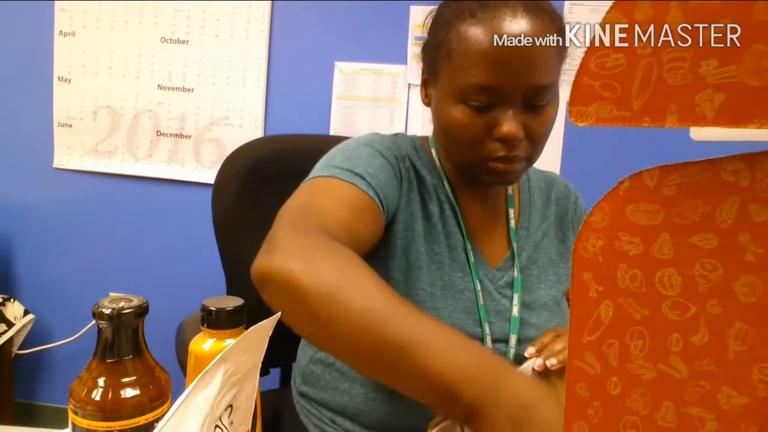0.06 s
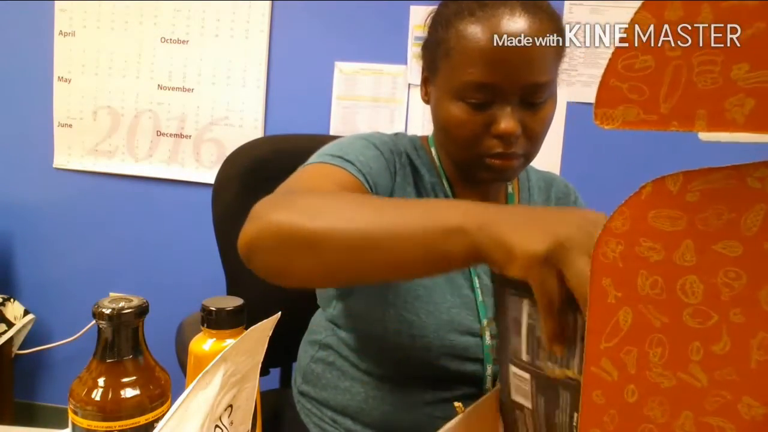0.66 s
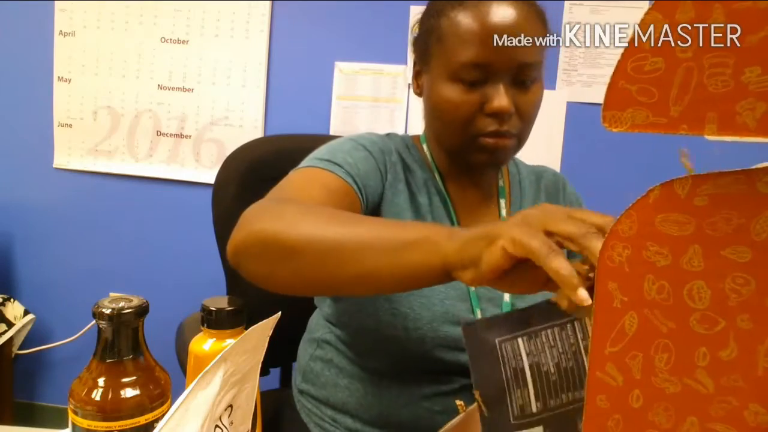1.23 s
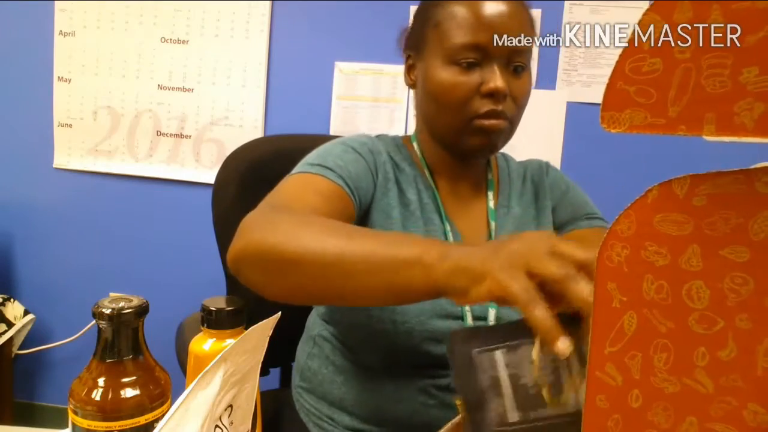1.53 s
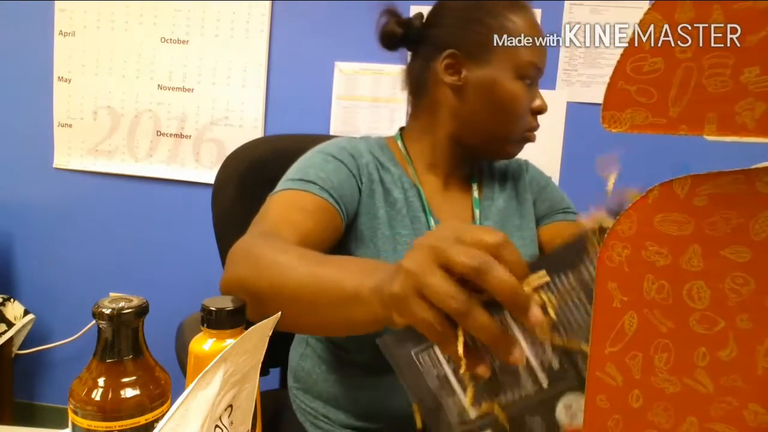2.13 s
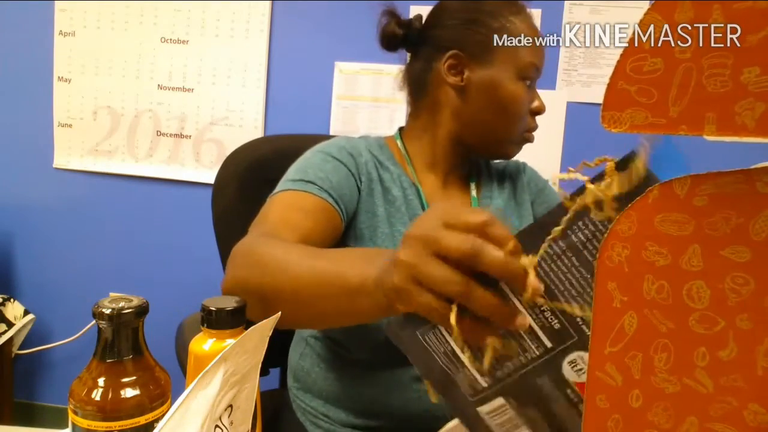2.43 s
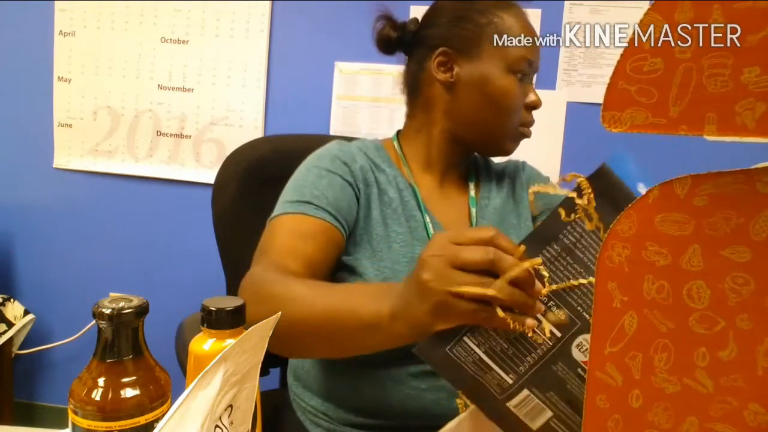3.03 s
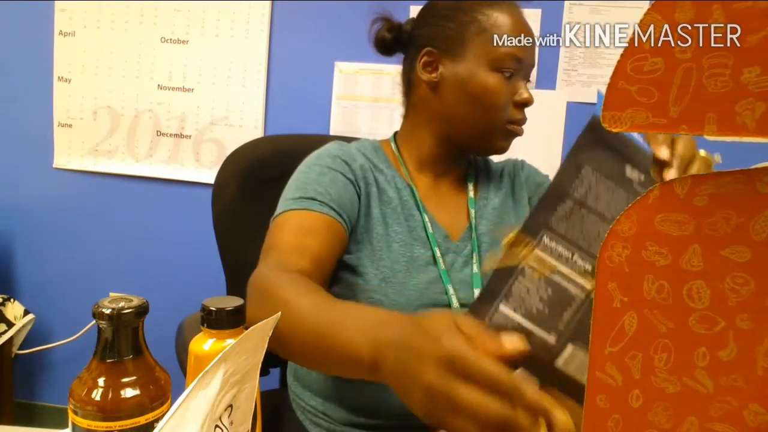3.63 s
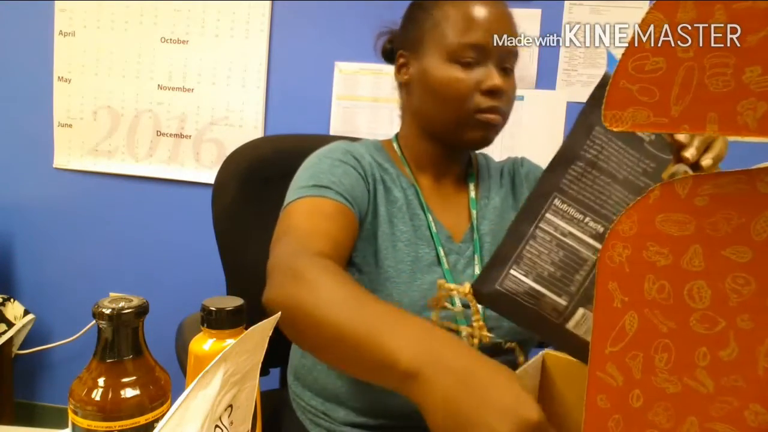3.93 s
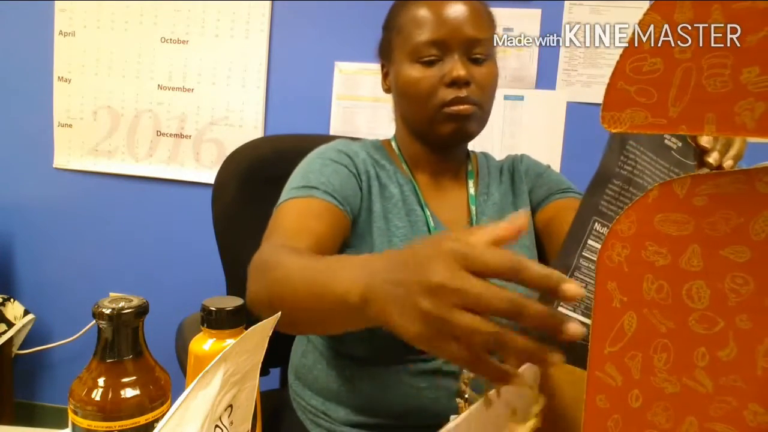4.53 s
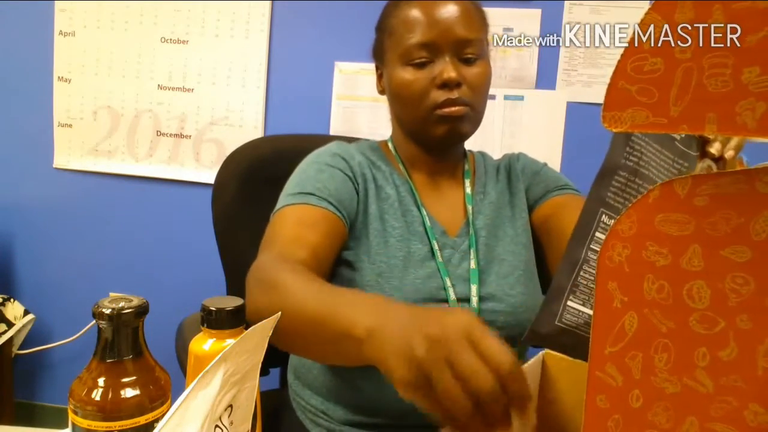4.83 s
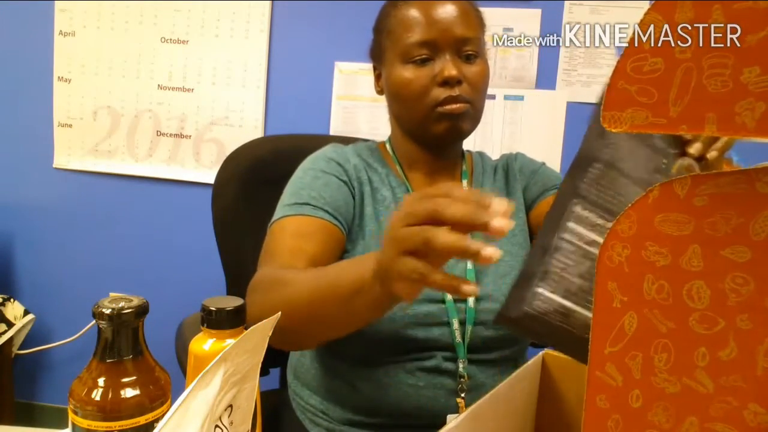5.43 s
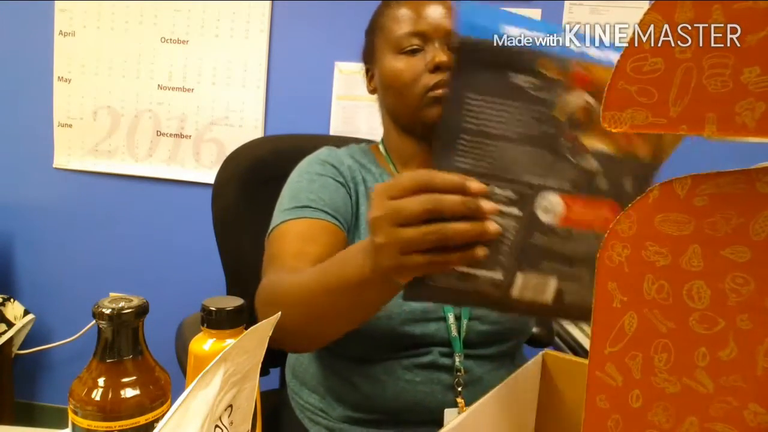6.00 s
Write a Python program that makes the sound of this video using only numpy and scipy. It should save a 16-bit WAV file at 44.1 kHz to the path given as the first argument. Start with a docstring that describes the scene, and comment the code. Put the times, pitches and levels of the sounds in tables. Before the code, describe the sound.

A plastic pouch is pulled from rustling paper filler in a cardboard box, then crackles more softly as it is handled.

```python
"""A plastic pouch is pulled out of crinkle-paper filler in a cardboard box on an office desk.
Strips and film hiss and crackle in countless tiny slips; each stroke swells, holds and settles over
the faint rustle of the grip. Creases snap, panels pop, the box hoots and is bumped and scraped, and
later the pouch rings softly as it is grabbed. The handling reaches the left of two closely spaced
microphone ports first and leans slightly right in level, in a small room with a low ventilation hum."""
import sys
import numpy as np
from scipy import signal
from scipy.fft import rfft, irfft
from scipy.io import wavfile
from scipy.ndimage import uniform_filter1d

SR = 44100
rng = np.random.default_rng(int(sys.argv[2]) if len(sys.argv) > 2 else 0)


def output_pcm(signal):
    """Save a mono or channel-first signal as 16-bit PCM at the path in sys.argv[1].

    Samples are clipped to [-1, 1] before scaling.
    """
    pcm = np.clip(np.atleast_2d(signal).T, -1, 1) * 32767
    wavfile.write(sys.argv[1], SR, np.round(pcm).astype(np.int16))


N = 276066

# Levels in the tables are relative: each source sets its own gain on the way to the microphone.
# strokes of the hand: start_s, rise_s, hold_s, crinkle_db, then against it wad_db, drag_db, fizz_db
STROKES = [(0, 0.0014, .008, -31, -4, -6, -14), (.035, 0.023, 0.018, -32.5, -0.5, -0.5, -5),
           (0.077, 0.032, 0.048, -33.5, 1.5, 0.5, -24), (0.166, .02, 0.023, -47.5, 7, 9, -19),
           (0.305, 0.013, 0.095, -30.5, 0, 4, -16), (0.321, 0.087, 0.053, -22, -8.5, -10.5, -13.5),
           (0.468, 0.019, 0.067, -36, 0, 0, -12), (0.577, 0.037, 0.11, -40.5, -3.5, 0, -12.5),
           (.643, 0.0045, 0.029, -36.5, -0.5, 4.5, -10), (0.708, 0.052, .03, -34, 1, 1, -19),
           (0.759, 0.039, 0.023, -25, -5.5, -10, -14), (0.815, 0.014, 0.036, -28.5, -7, -14, -11.5),
           (0.935, 0.023, 0.032, -47.5, -0.5, -2, -19), (1.046, .045, .04, -46, -2.5, -2.5, -22),
           (1.138, 0.043, 0.1, -50, -11, -5, -16), (1.238, 0.0053, 0.018, -48.5, 0.5, 7, -20),
           (1.318, .02, 0.033, -53, -26, -14, -14), (1.468, 0.058, 0.069, -47.5, -5, -4, -15),
           (1.589, 0.044, 0.12, -42, -13.5, -14, -12), (1.758, 0.024, 0.047, -42, -4, 1, -15),
           (1.828, 0.019, 0.073, -41.5, -12.5, -16.5, -10.5), (2.011, 0.035, 0.1, -49, -10, -19, -12),
           (2.169, 0.034, .005, -42.5, -11, -13.5, -10), (2.286, .025, 0.024, -49.5, -12, -8, -11),
           (3.026, .11, 0.016, -60, -6, 4, -19), (3.195, 0.17, .05, -54.5, -7, -2, -18),
           (3.517, 0.065, 0.13, -48.5, -8.5, -6.5, -19), (3.827, 0.052, 0.057, -48, -5.5, -15, -19),
           (4.231, 0.022, 0.095, -58, -5.5, -3, -12.5), (4.608, .015, 0.047, -66, -11, -15, -15),
           (4.748, 0.045, 0.019, -63, -12, -9.5, -11), (4.948, 0.076, .12, -66.5, -2.5, 0.5, -9),
           (5.74, 0.027, 0.032, -48.5, -1, -0.5, -27), (5.844, .015, .015, -62.5, -2, 5.5, -20),
           (5.902, 0.016, 0.02, -51, -3, -3.5, -17)]
# faint rustle of the pouch held between strokes: time_s, crinkle_db
GRIP_LEVEL = [(.25, -45.5), (.9, -47), (1.05, -57), (1.43, -62), (1.95, -49), (2.45, -60.5), (2.75, -67.5),
              (3.0, -67), (3.5, -57), (4.05, -69), (4.55, -73.5), (5.2, -71.5), (5.6, -78), (6.26, -74.5)]
# crinkle of the paper strips: frequency_hz, level_db
PAPER_SPECTRUM = [(1200, -57.5), (2600, -7.5), (4000, -6.5), (5200, -5), (6500, 0), (8200, -6),
                  (10000, -11.5), (12500, -23), (15500, -29)]
# crinkle of the free pouch's film: frequency_hz, level_db
FILM_SPECTRUM = [(1200, -48), (2600, -5.5), (4000, -8), (5200, -5.5), (6500, -1), (8200, -2.5),
                 (10000, -12.5), (12500, -19.5), (15500, -25)]
# duller crumple of the paper wad: frequency_hz, level_db
WAD_SPECTRUM = [(350, -17), (600, -2), (780, -1.5), (980, -3), (1300, -1.5), (1900, -5.5), (2800, -6.5),
                (4200, -6.5), (8000, -34)]
# fizz of the finest slips: frequency_hz, level_db
FIZZ_SPECTRUM = [(4000, -40), (8000, 6.5), (10000, 15), (12000, 10), (15000, 2.5)]
# the pouch's own walls flexing: frequency_hz, level_db
FLEX_SPECTRUM = [(80, -20.5), (170, -2), (235, 0.5), (350, 1), (480, -0.5), (620, -7.5), (790, -3),
                 (1050, -16.5), (3000, -46)]
# sharp creases snapping: start_s, level_db, ring_hz, give_way_s
SNAPS = [(.0325, -13.5, 6450, .0016), (.0497, -14, 6940, 0.00072), (.1115, -33, 7000, .0005),
         (.1217, -27, 5400, .001), (.1295, -29, 4500, 0.00044), (.1529, -24.5, 6100, .0012),
         (.246, -32.5, 6160, .001), (.6535, -17.5, 6240, 0.0013), (1.1258, -39, 6540, .0007),
         (1.1507, -32.5, 6950, 0.00078), (1.1872, -37.5, 7400, .0009), (1.2064, -34, 7300, 0.00072),
         (1.3153, -29, 7640, 0.0014), (1.3585, -42, 7700, .001), (1.6127, -43, 7160, .001),
         (1.7408, -33, 6340, 0.0022), (1.7796, -28, 7000, .0015), (1.7868, -31, 6450, 0.00098),
         (1.8472, -32.5, 7510, .002), (1.9075, -35, 6300, 0.001), (2.0127, -38, 7400, .001),
         (2.193, -47, 8260, .002), (2.2252, -34.5, 6560, 0.00041), (3.2427, -46, 6600, 0.0012),
         (3.5945, -41, 7000, .0012), (3.6275, -36, 5800, 0.0024), (3.678, -40.5, 5450, .002),
         (4.2614, -38.5, 8200, .0009), (5.0246, -49, 6450, 0.0013), (5.0662, -50, 6760, .0014),
         (5.0785, -41.5, 5340, .0005), (5.0822, -33, 6750, 0.001), (5.2123, -52, 6100, .0007),
         (5.7535, -44.5, 4100, .0012), (5.9252, -37.5, 5570, .0005)]
# snap of a middle-sized crease: frequency_hz, level_db
SNAP_SPECTRUM = [(500, -21), (2000, -2.5), (3500, 2), (6500, 0), (9000, 0.5), (12000, -8), (15500, -14)]
# pouch panels popping: start_s, level_db, ring_hz, push_db (air, relative), muffled_above_hz
POPS = [(.0335, -19.5, 2020, -19, 9000), (.0922, -27, 750, -1.5, 3000), (.2469, -29.5, 1160, -1.5, 7000),
        (.879, -35, 600, -4, 2500), (.9072, -26, 3020, -5, 9000), (.97, -35, 1830, 0, 7500),
        (1.064, -41.5, 1300, 3, 8000), (1.0905, -37, 875, 0, 4500), (1.1028, -35.5, 1400, -6, 6000),
        (1.2535, -33.5, 1090, -2.5, 9000), (1.4632, -50.5, 1190, 6.5, 2500), (1.5208, -38, 2400, -1, 3200),
        (1.5278, -32, 1830, -4.5, 5000), (1.7794, -33.5, 1300, -8, 7000), (1.7865, -34, 800, -5, 4000),
        (2.0233, -42, 890, 0, 2800), (2.0501, -32, 1290, -5, 6000), (2.2255, -43, 1500, -7, 7000),
        (2.4933, -51, 850, 6.5, 1150), (2.6115, -52, 1480, -12, 3000), (2.7005, -49.5, 880, -2, 1240),
        (2.7826, -48.5, 1150, 1.5, 2000), (2.9036, -50.5, 1150, 2.5, 3000), (3.0479, -50.5, 1090, -8, 4000),
        (3.0864, -46.5, 2200, -18, 4000), (3.135, -53.5, 900, 1, 2000), (3.2198, -55, 900, 8, 2500),
        (3.2617, -41, 1780, -10, 7000), (3.3553, -41, 1190, -3.5, 3200), (3.3635, -49, 1010, 1, 2000),
        (3.574, -41.5, 960, 5, 9000), (3.6869, -39.5, 1800, -7, 5960), (4.2866, -52, 1002, 0.5, 3000),
        (5.4493, -49, 1895, -9, 3800), (5.6602, -46.5, 1005, -12, 1410), (5.7527, -43, 1980, -5.5, 4960),
        (5.7787, -34, 2400, -5, 6000), (5.7885, -41, 800, -5, 3500), (5.8105, -41, 900, 0, 1380),
        (5.859, -54, 790, -1, 1100), (5.8847, -44.5, 1200, -6, 1700), (5.9248, -37, 2490, -5, 7000),
        (6.1454, -55.5, 1020, -2, 2010)]
# pop of a middle-sized panel: frequency_hz, level_db
POP_SPECTRUM = [(200, -9.5), (500, -2), (1000, -1.5), (1900, -3.5), (2900, -3), (4500, -22), (10000, -36.5)]
# low push of air from a panel: frequency_hz, level_db
PUSH_SPECTRUM = [(50, -24.5), (150, -8), (230, -0.5), (310, 0.5), (430, -2), (620, -11), (850, -9.5),
                 (2500, -53.5)]
# the pouch dragging along the box wall: frequency_hz, level_db
DRAG_SPECTRUM = [(70, -34), (180, -20.5), (300, -2), (450, 1.5), (700, -5.5), (1100, -15.5), (3000, -38)]
# the hollow's pitch, which sinks to a lower note around 0.65 s: time_s, pitch_hz
HOLLOW_PITCH = [(.02, 436), (.12, 492), (.245, 355), (.3, 453), (.42, 452), (.46, 494), (.5, 437),
                (.58, 444), (0.649, 297), (.69, 288), (.745, 425), (.84, 457), (.92, 367)]
# resonances of the hollow: pitch_ratio, width_hz, level_db
HOLLOW_MODES = [(1.001, 65, 0), (1.8, 110, -14), (2.85, 70, -11), (3.65, 85, -14.5)]
# modes of the cardboard wall: pitch_hz, level_db, t60_s
WALL_MODES = [(108.5, -6, 0.33), (133.4, -11, 0.21), (256, -1, .22), (304, -17, .11), (476.5, -1, 0.18),
              (660, -2, 0.07), (767, 3.5, 0.1), (904, -5.5, .11), (1196, -1.5, 0.093), (1540, -4, 0.078)]
# the wall rubbed: start_s, rise_s, hold_s, level_db
WALL_SCRAPE = (3.85, 0.08, 0.05, -46)
# hollow knocks, the box wall bumped and later a soft ring as the pouch is grabbed:
# start_s, level_db, middle_hz of the modes that ring
KNOCKS = [(1.782, -33.5, 151), (1.781, -36, 800), (1.795, -32.5, 400), (5.809, -53, 250), (5.81, -50, 797)]
# the box shifting on the desk: time_s, level_db
SHIFT_LEVEL = [(0, -52), (.9, -55.5), (1.3, -57), (2, -52.5), (2.8, -68), (3.9, -59), (4.2, -80),
               (5.6, -77.5), (5.9, -60.5), (6.26, -67.5)]
# rumble of the shifting box: frequency_hz, level_db
RUMBLE_SPECTRUM = [(30, -22.5), (62, -9.5), (85, 2.5), (130, -4.5), (400, -33.5)]
# air noise of the ventilation: frequency_hz, level_db
AIR_SPECTRUM = [(12, -39), (20, -4), (44, -5.5), (63, -9.5), (106, 0.5), (225, -12.5), (315, -15),
                (958, -29), (2150, -30), (7730, -32), (15500, -34)]
# ventilation hum: pitch_hz, level_db
HUM_TONES = [(87, -64), (119, -68)]
# decay of the office: frequency_hz, t60_s
ROOM_DECAY = [(150, 0.69), (500, 0.11), (1400, 0.15), (4000, 0.22), (9000, 0.13), (15000, 0.12)]
# the handling's slight lean to the right in level: time_s, left_minus_right_db
HANDLING_BALANCE = [(.9, -1.5), (1.2, -1.8), (6.26, -2)]
# diffuse sound at the two ports: frequency_hz, likeness (0-1)
PORT_LIKENESS = [(100, 0.96), (300, .9), (600, 0.4), (1200, 0), (2500, 0.05), (15000, 0.08)]
# each port has its own treble resonance: frequency_hz, left_minus_right_db
PORT_BALANCE = [(300, 2.5), (750, 4), (1800, 3), (4000, 1.5), (5000, 3), (5800, 3.5), (6500, 11.5),
                (7300, -6.5), (8400, -7), (10000, -2), (12000, 0), (15000, 0.5)]

CLEAR_S = 0.97  # the pouch comes clear of the box
SETTLE_DB_PER_S, RISE_POWER = 270, 0.98  # shape of every stroke
LINGER_DB, LINGER_DB_PER_S = -14, 109  # a few strips go on springing back after a stroke
GRIP_WAD_DB, GRIP_DRAG_DB, GRIP_FIZZ_DB = -7.5, -5, -11.5  # offsets from the grip's crinkle_db
SNAP_SIZE_POWER, MIDDLE_SNAP_HZ = 0.54, 6250  # a smaller, higher crease is brighter all over
POP_SIZE_POWER, MIDDLE_POP_HZ = 0.57, 1000  # a pop's whole spectrum follows the ring of its panel
TICK_DB, TICK_HZ, TICK_S = -3.5, 4240, .0007  # a pop also snaps the crease at its edge
AIR_DB, BAND_LIMIT_HZ = -60.5, 15500


def pouch_in_filler(spot_count=4):
    """Paper and film slip under the hand: crinkle and fizz, the wad's crumple, the pouch's low drag."""
    in_box = np.arange(N) / SR < CLEAR_S
    crinkle_gain, wad_gain, drag_gain, fizz_gain = handling()
    fine = slips(per_s=2200, spread_db=3.5, clump_db=1.5)
    coarse = slips(per_s=800, spread_db=2.5)
    paper = crackle(fine, PAPER_SPECTRUM, ring_db=9.5, octaves=0.13, low_hz=2400, high_hz=12200)
    film_slips = slips(per_s=1100, spread_db=3.5, clump_db=1)
    film = crackle(film_slips, FILM_SPECTRUM, ring_db=12, octaves=0.14, low_hz=2583, high_hz=11970)
    wad = crackle(coarse + 0.36 * fine, WAD_SPECTRUM, ring_db=9.5, octaves=.12, low_hz=600, high_hz=3500)
    finest = slips(per_s=5200, spread_db=3.5, clump_db=1.5)
    fizz = unit_rms(colour(finest + 0.44 * fine, FIZZ_SPECTRUM))
    # tugs sound in the hollow of the box at first, then only in the pouch's own walls
    tugs = slips(per_s=600, spread_db=0, clump_db=1)
    flex = unit_rms(colour(tugs, FLEX_SPECTRUM)) * ~in_box
    rustle = (gain_of(-3.5) * crinkle_gain * np.where(in_box, paper, film)
              + gain_of(-3.5) * wad_gain * wad
              + gain_of(-7) * drag_gain * flex
              + gain_of(1) * fizz_gain * fizz)
    # the point of contact roams between spots, each with its own echoes
    place = 2 * np.pi * wander(count=70)
    out = box_hollow(drag_gain * in_box)
    for spot in range(spot_count):
        share = np.maximum(np.cos(place + 2 * np.pi * spot / spot_count), 0)
        out += office(share * rustle, tail_db=-1.5, near_db=1.58, near_s=.0075, lead_samples=1 + spot % 3)
    return out


def handling():
    """Gains of crinkle, wad, drag and fizz: the grip plus every stroke, added as powers."""
    blends, shapes = [[0, GRIP_WAD_DB, GRIP_DRAG_DB, GRIP_FIZZ_DB]], [gain_curve(GRIP_LEVEL)]
    for start_s, rise_s, hold_s, db, *blend_db in STROKES:
        stroke = swell(start_s, rise_s, hold_s, SETTLE_DB_PER_S)
        linger = gain_of(LINGER_DB) * swell(start_s, rise_s, hold_s, LINGER_DB_PER_S)
        blends.append([0, *blend_db])
        shapes.append(gain_of(db) * np.maximum(stroke, linger))
    return np.sqrt(gain_of(blends).T ** 2 @ np.square(shapes))


def swell(start_s, rise_s, hold_s, settle_db_per_s):
    """Gain of one movement: it builds up, holds, and dies away."""
    t, out = np.arange(SR) / SR, np.zeros(N)
    rise = np.minimum(t / max(rise_s, 1e-3), 1) ** RISE_POWER
    settle = gain_of(-settle_db_per_s * np.maximum(t - rise_s - hold_s, 0))
    add(out, start_s, rise * settle)
    return out


def slips(per_s, spread_db, clump_db=2):
    """Countless tiny slips, most small and a few large, that come in clumps."""
    at = np.flatnonzero(rng.random(N) < per_s / SR)
    size_db = spread_db * np.minimum(rng.exponential(1, N)[at], 5) + clump_db * wander(count=900)[at]
    train = np.zeros(N)
    train[at] = gain_of(size_db) * np.sign(rng.random(N)[at] - .5)
    return train / np.sqrt(abs(uniform_filter1d(train ** 2, size=2000)) + 0.0011)


def crackle(train, spectrum, ring_db, octaves, low_hz, high_hz, count=10):
    """Each slip rings one strip or facet, and each of these has its own pitch."""
    facet = rng.integers(0, count, N)
    return unit_rms(sum(colour(train * (facet == k), spectrum, hz, ring_db, octaves)
                        for k, hz in enumerate(np.geomspace(low_hz, high_hz, count))))


def crease_snaps(spot_count=3):
    """Stiff creases flip at several spots, each with its own echoes."""
    spots = np.zeros((spot_count, N))
    for k, (start_s, db, ring_hz, give_way_s) in enumerate(SNAPS):
        add(spots[k % spot_count], start_s, crease(db, ring_hz, give_way_s))
    return gain_of(3) * sum(office(spot, tail_db=-3, near_db=-0.5, near_s=0.0029) for spot in spots)


def crease(db, ring_hz, give_way_s):
    """The bright tick of one crease."""
    spectrum = np.array(SNAP_SPECTRUM) * [(ring_hz / MIDDLE_SNAP_HZ) ** SNAP_SIZE_POWER, 1]
    return at_level(colour(fractures(give_way_s), spectrum, ring_hz, ring_db=11, octaves=0.32), db)


def fractures(give_way_s, size=2048):
    """A crease gives way in a quick run of tiny fractures that favours no one pitch."""
    fade = np.exp(-np.arange(size) / SR / max(give_way_s, 1e-4))
    spectrum = rfft(rng.standard_normal(size) * fade)
    return irfft(spectrum / (abs(spectrum) + 1e-9)) * np.sqrt(fade)


def panel_pops(spot_count=4):
    """A pouch panel buckles: a short hollow pop, a tick at its edge and a low push of air."""
    spots = np.zeros((spot_count, N))
    for k, (start_s, db, ring_hz, push_db, muffled_above_hz) in enumerate(POPS):
        spectrum = np.array(POP_SPECTRUM) * [(ring_hz / MIDDLE_POP_HZ) ** POP_SIZE_POWER, 1]
        buckle = colour(fractures(2.8 / ring_hz), spectrum, ring_hz, ring_db=5.5, octaves=0.33)
        pop = at_level(buckle, db) + crease(db + TICK_DB, TICK_HZ, TICK_S)
        muffle = signal.butter(3, min(muffled_above_hz, SR / 3), fs=SR)  # a finger on the panel
        muffled = at_level(signal.lfilter(*muffle, pop), db)
        push = at_level(colour(fractures(give_way_s=0.001), PUSH_SPECTRUM), db + push_db - 1.5)
        add(spots[k % spot_count], start_s, muffled + push)
    return gain_of(1.5) * sum(office(spot, tail_db=-5.5, near_db=0.5, near_s=0.008) for spot in spots)


def box_hollow(drag_gain):
    """Dragged along the wall, the pouch makes the box's hollow hoot; its pitch follows a set curve."""
    pitch_hz = np.interp(np.arange(N) / SR, *np.transpose(HOLLOW_PITCH))
    tugs = slips(per_s=900, spread_db=.5, clump_db=0.5)
    hoot = sum(gain_of(db) * unit_rms(resonate(tugs, ratio * pitch_hz, width_hz))
               for ratio, width_hz, db in HOLLOW_MODES)
    hoot /= np.sqrt(abs(uniform_filter1d(hoot ** 2, size=1200)) + .05)  # the hand pulls steadily
    drag = gain_of(-3) * hoot + gain_of(-6) * unit_rms(colour(tugs, DRAG_SPECTRUM))
    return office(drag_gain * drag, tail_db=-8, near_db=-11, near_s=0.0031, lead_samples=3)


def box_and_knocks():
    """The rubbed wall and the hollow knocks ring one set of modes; the box rumbles as it shifts."""
    t = np.arange(SR // 2) / SR
    hz, db, t60_s = np.array(WALL_MODES).T[:, :, None]
    modes = gain_of(db - 60 * t / t60_s) * np.sin(2 * np.pi * (hz * t + rng.random(hz.shape)))
    ring = modes.sum(0)
    start_s, rise_s, hold_s, rub_db = WALL_SCRAPE
    rub_gain = gain_of(rub_db) * swell(start_s, rise_s, hold_s, settle_db_per_s=900)
    out = signal.oaconvolve(rub_gain * slips(per_s=1200, spread_db=4), ring / np.linalg.norm(ring))[:N]
    onset = 1 - np.exp(-t / 0.0034)
    for knock_s, knock_db, middle_hz in KNOCKS:
        woken = np.exp(-(np.log2(hz / middle_hz) / 0.61) ** 2)
        add(out, knock_s, at_level((woken * modes).sum(0) * onset, knock_db))
    out += gain_curve(SHIFT_LEVEL) * unit_rms(colour(rng.standard_normal(N), RUMBLE_SPECTRUM))
    return office(out, tail_db=-12, near_db=-15, near_s=0.005)


def ventilation():
    """Room tone: soft air noise all around the microphone and a wavering hum in the centre."""
    t = np.arange(N) / SR
    air = np.array([unit_rms(colour(rng.standard_normal(N), AIR_SPECTRUM, size=8192)) for _ in range(2)])
    hum = np.zeros(N)
    for hz, db in HUM_TONES:
        wavering_gain = gain_of(db + 5 * wander(count=110))
        hum += wavering_gain * np.sin(2 * np.pi * hz * t + 0.62 * wander(count=110))
    return gain_of(AIR_DB) * at_ports(air) + np.sqrt(2) * hum


def office(x, tail_db, near_db, near_s, lead_samples=2, size=16384):
    """Direct sound, left port first; then near echoes from box and desk, and the small room's tail."""
    t = np.arange(size) / SR
    taps = rng.choice([-1., 1.], (2, size)) * (rng.random((2, size)) < 5000 / SR)  # 5000 echoes a second
    near = at_ports(taps * np.exp(-t / near_s) * (t > .0006))
    hz, times, diffuse = signal.stft(rng.standard_normal((2, size)) * (t > .007), SR, nperseg=256)
    decay = gain_of(-60 * times / value_at(ROOM_DECAY, hz)[:, None])
    tail = at_ports(signal.istft(diffuse * decay, SR, nperseg=256)[1][:, :size])
    response = (gain_of(near_db) * unit_rms(near) + gain_of(tail_db) * unit_rms(tail)) / np.sqrt(size)
    response[0, 0] += 1
    response[1, lead_samples] += 1
    return signal.fftconvolve(x[None], response, axes=1)[:, :N]


def at_ports(pair):
    """Makes two unrelated signals alike in the bass, as diffuse sound is at closely spaced ports."""
    size = pair.shape[1]
    likeness = np.clip(value_at(PORT_LIKENESS, np.fft.rfftfreq(size, 1 / SR)), 0, 1)
    mid, side = rfft(pair) * np.sqrt([1 + likeness, 1 - likeness])
    return irfft(np.array([mid + side, mid - side]), size) / np.sqrt(2)


def colour(x, spectrum, ring_hz=1000, ring_db=0, octaves=.3, size=2048):
    """Causal filter with the given spectrum and an optional resonance."""
    hz = abs(np.fft.fftfreq(size, 1 / SR))
    db = value_at(spectrum, hz) + ring_db * np.exp(-.5 * (np.log2((hz + 1) / ring_hz) / octaves) ** 2)
    minimum_phase = np.exp(np.conj(signal.hilbert(np.log(gain_of(db)))))
    return signal.oaconvolve(x, np.fft.ifft(minimum_phase).real[:size // 2])[:len(x)]


def resonate(x, hz, width_hz):
    """A steep resonance whose centre follows the curve hz."""
    turn = np.exp(2j * np.pi * np.cumsum(hz) / SR)
    pole = np.exp(-np.pi * width_hz / SR)
    return (turn * signal.lfilter([(1 - pole) ** 2], [1, -2 * pole, pole * pole], x / turn)).real


def wander(count):
    """A curve through count random points spread over the scene."""
    return np.interp(np.arange(N), np.linspace(0, N, count), rng.standard_normal(count))


def gain_of(db):
    """Decibels to amplitude."""
    return 10 ** (np.asarray(db) / 20)


def gain_curve(rows):
    """A level curve as a gain for every sample."""
    return gain_of(np.interp(np.arange(N) / SR, *np.transpose(rows)))


def unit_rms(x):
    """Scales to rms 1."""
    return x / np.sqrt(np.mean(x ** 2) + 1e-20)


def at_level(x, db):
    """Scales a hit so that its loudest 2 ms have the given level."""
    return gain_of(db) * x / np.sqrt(uniform_filter1d(x ** 2, size=88).max())


def value_at(table, hz):
    """Reads a table on a log-frequency axis."""
    table_hz, values = np.transpose(table)
    return np.interp(np.log(hz + 1), np.log(table_hz + 1), values)


def add(mix, start_s, sound):
    """Mixes a sound in at a time."""
    part = mix[max(round(start_s * SR), 0):][:len(sound)]
    part += sound[:len(part)]


def scene():
    """The handling at the desk, leaning slightly right in level, over the room tone."""
    lean = np.sqrt(gain_curve(HANDLING_BALANCE))
    desk = pouch_in_filler() + crease_snaps() + panel_pops() + box_and_knocks()
    return desk * np.array([lean, 1 / lean]) + ventilation()


def record(dry):
    """The microphone's two ports colour the sound differently, and the top treble is cut off."""
    balance_db = value_at(PORT_BALANCE, np.fft.rfftfreq(N, 1 / SR))
    ported = irfft(rfft(dry) * gain_of([balance_db / 2, -balance_db / 2]), N)
    low_pass = signal.firwin(301, BAND_LIMIT_HZ, window=("kaiser", 9), fs=SR)
    return signal.oaconvolve(ported, low_pass[None], "same")


dry = scene()
out = record(dry)
output_pcm(out)
```